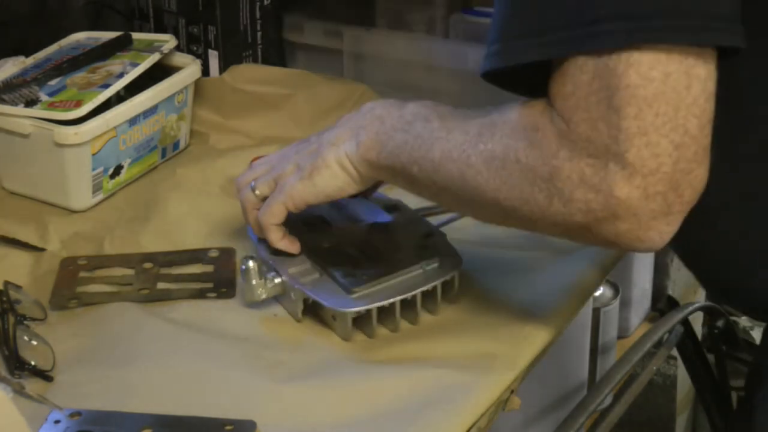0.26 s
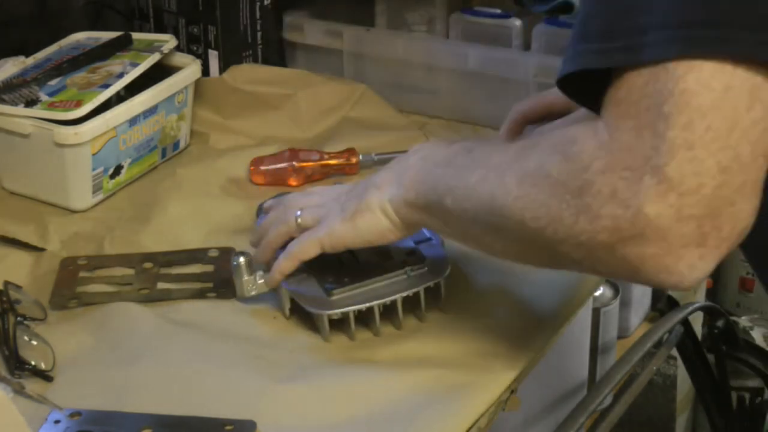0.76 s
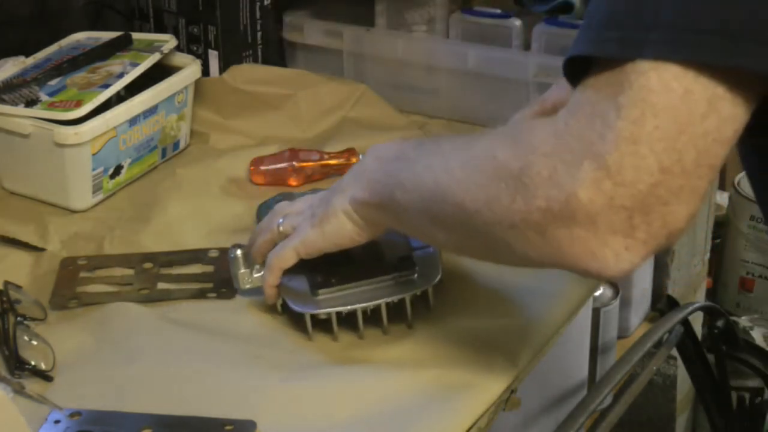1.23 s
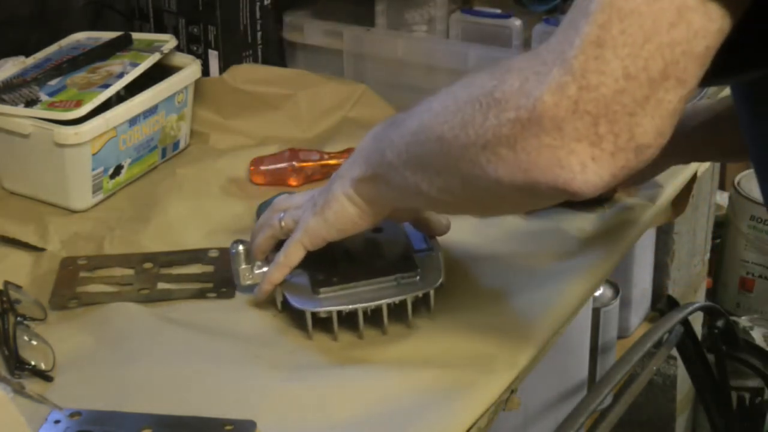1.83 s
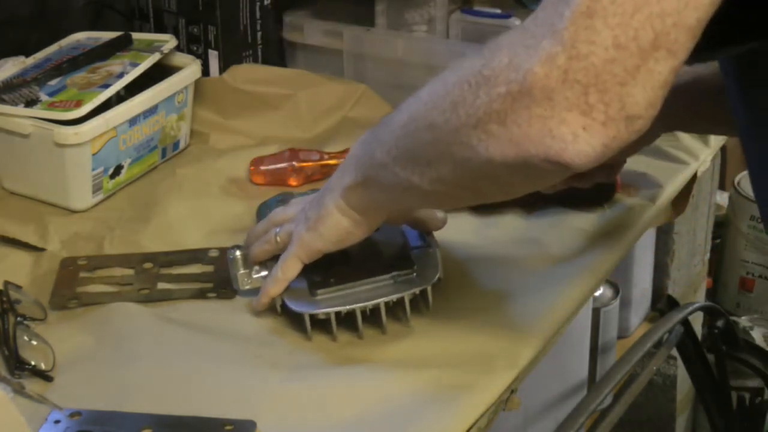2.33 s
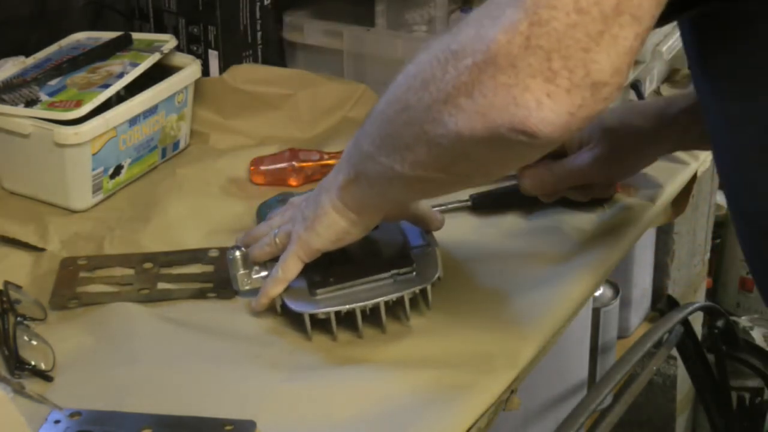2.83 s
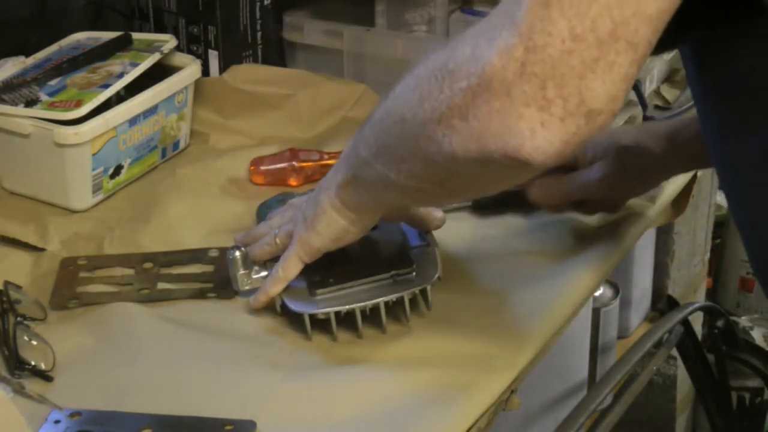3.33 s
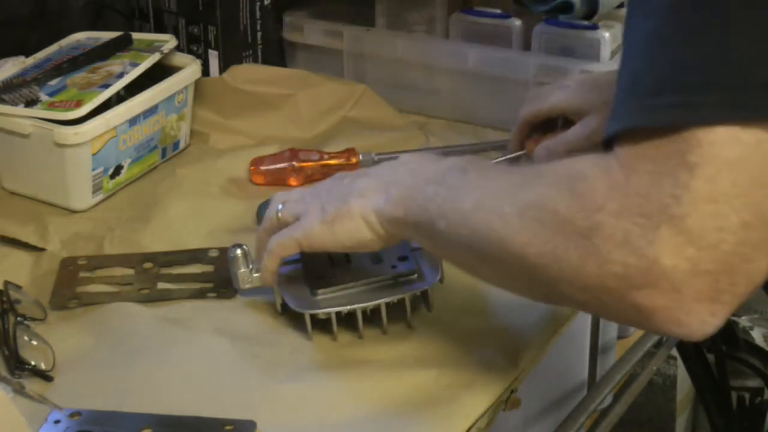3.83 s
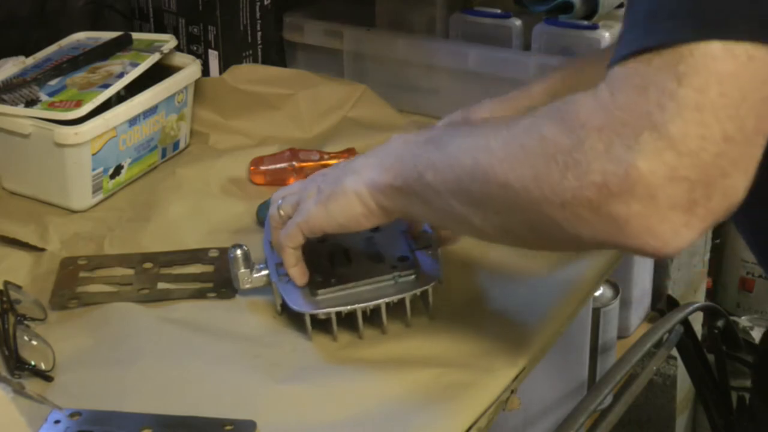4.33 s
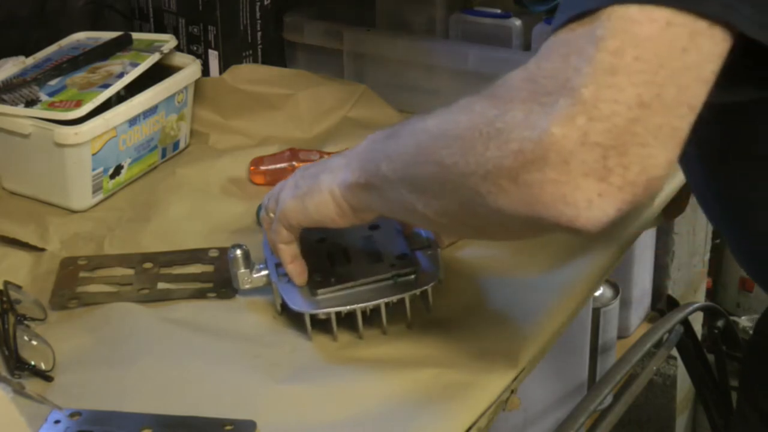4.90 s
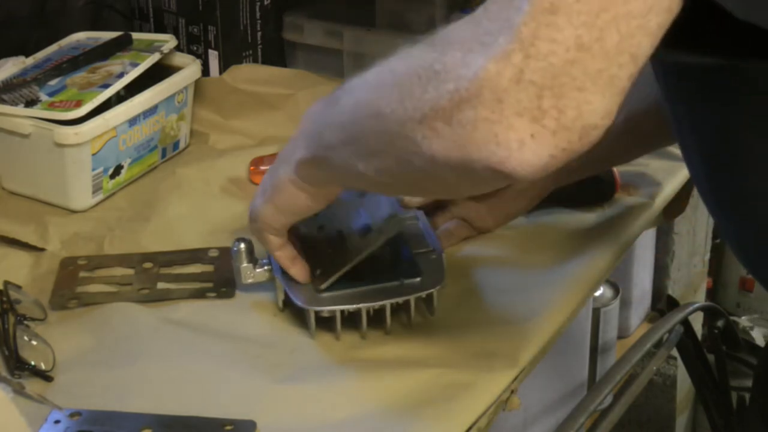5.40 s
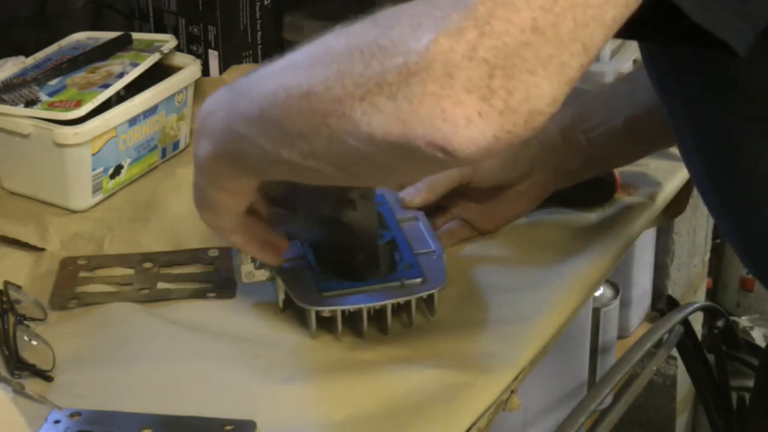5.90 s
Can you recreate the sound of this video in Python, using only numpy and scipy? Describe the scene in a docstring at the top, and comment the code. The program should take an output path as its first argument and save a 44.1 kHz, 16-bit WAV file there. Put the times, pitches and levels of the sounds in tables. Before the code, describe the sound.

A faint hum and thin, high electrical whine fill a small workshop, heard close in stereo with a short room echo. For the first 1.3 seconds a finned metal cylinder head slides over a paper-covered bench, with dry hissing, gritty ticks and soft low bumps. A screwdriver blade pings lightly at about 1 second and more faintly at 1.7, followed by a few quiet ticks. At 2.8 seconds the prised joint breaks free with a sharp, loud metallic snap, then knocks again at about 3.2. After a short slide, the screwdriver lands on the bench at about 4 seconds with a clatter and thud. More paper rubbing and small clicks follow from 4.1 to 5.4 seconds. From about 5.7 seconds the loosened metal plate clinks and rings lightly with soft knocks as it is lifted, ending in a bright clink just after 6 seconds.

```python
"""A faint hum and a thin electrical whine hang in a small workshop, heard in stereo close to the bench.
A finned compressor head is shifted about on the paper-covered top: paper hisses, grit ticks, the bench
booms. A screwdriver blade pings on the metal and prises until the joint snaps free. The tool is dropped
on the bench, and the loosened plate clinks as it is lifted. Each blow sets a metal body ringing in its
own modes, and the near walls return a short tail to the microphones."""
import sys
import numpy as np
from scipy import signal
from scipy.fft import rfft, irfft
from scipy.io import wavfile

SR = 44100
rng = np.random.default_rng(int(sys.argv[2]) if len(sys.argv) > 2 else 0)


def output_pcm(signal):
    """Save a mono or channel-first signal as 16-bit PCM at the path in sys.argv[1].

    Samples are clipped to [-1, 1] before scaling.
    """
    pcm = np.clip(np.atleast_2d(signal).T, -1, 1) * 32767
    wavfile.write(sys.argv[1], SR, np.round(pcm).astype(np.int16))


N = 271215
TIME = np.arange(N) / SR
RING_TIME = TIME[:SR // 2]
CUTOFF_HZ = 16100

# Levels are relative within each table. Room tone, spectrum of the still air: f/Hz, level/dB
AIR_SPECTRUM = [(25, -38), (60, -11), (100, -10.5), (140, -9.5), (220, -3), (300, -9), (380, -3.5),
                (440, -7), (550, -13.5), (800, -12), (1050, -20.5), (2200, -14.5), (4500, -18.5),
                (9000, -24.5), (16000, -27)]
# steady hum and whine: f/Hz, level/dB
HUM_TONES = [(100, -78.5), (301, -75.5), (866, -74), (15627.3, -67.5)]
# stereo width of the air and of the wall reflections: f/Hz, side minus mid/dB
AIR_WIDTH = [(30, 17), (65, 10), (110, 8.5), (380, 8.5), (700, 3), (2400, -5), (5000, -8.5), (15000, 1.5)]
TAIL_WIDTH = [(30, 17.5), (65, 11.5), (125, -11), (380, -1), (700, 0), (1300, 0), (2400, -1.5),
              (4400, -10.5), (8000, -8.5), (14000, 2.5)]

# a hand pushes the head or the tool over the paper: t/s, rise/s, length/s, hiss/dB, rumble/dB
SLIDES = [(0.032, 0.006, 0.049, -50.5, -63.5), (0.094, 0.071, 0.29, -46.5, -62.5),
          (0.535, 0.025, 0.069, -52.5, -59), (0.629, 0.015, 0.21, -58, -66),
          (0.899, 0.015, 0.12, -57.5, -64), (1.044, 0.067, 0.11, -45, -49), (1.195, 0.018, 0.11, -60, -67),
          (2.259, 0.048, 0.019, -57, -62), (3.31, 0.024, 0.035, -60.5, -60.5), (3.6, .03, .06, -65, -68),
          (3.777, 0.057, 0.185, -54.5, -60), (4.056, 0.028, .45, -59, -67.5),
          (4.557, 0.011, 0.17, -55, -60), (5.193, 0.056, 0.077, -50.5, -64), (5.41, 0.013, 0.018, -59, -80)]
# spectra of the rubbed paper, the bench under it and the grit: f/Hz, level/dB
HISS_SPECTRUM = [(300, -11), (1200, -16), (1900, 2.5), (3200, 0), (4500, 1.5), (6500, -2.5), (8500, -6),
                 (12000, -10), (16000, -16.5)]
RUMBLE_SPECTRUM = [(60, -11), (170, 11), (300, 6), (550, 6), (800, 6), (1300, -5), (3000, -47),
                   (16000, -108)]
GRIT_SPECTRUM = [(100, -39), (600, 2.5), (1100, -1.5), (2000, 6.5), (4500, 5.5), (6500, 4), (9000, 1.5),
                 (16000, -23)]
# grit and small edges catch; the last row is a bright clink of the plate:
# t/s, level/dB, centre f/Hz, crackle/dB
SHARP_TICKS = [(0.049, -25.5, 4300, -38.5), (0.248, -29.5, 1770, -47), (0.347, -31, 2840, -46),
               (0.461, -27, 4370, -52), (0.57, -31, 1980, -77), (0.622, -35.5, 3080, -43.5),
               (1.22, -32, 2970, -79), (1.277, -41, 7900, -43), (1.314, -35, 4750, -57),
               (1.585, -41, 4550, -65), (1.618, -35.5, 2250, -83), (1.846, -41.5, 2880, -80),
               (1.895, -41, 4000, -57), (2.232, -40, 3080, -84), (2.317, -40, 2570, -63),
               (3.295, -38.5, 2265, -57), (4.282, -40.5, 3000, -50), (4.335, -33.5, 5100, -64),
               (4.434, -35, 2500, -51), (4.562, -27.5, 5330, -41), (4.589, -28, 6220, -57),
               (4.639, -30, 3830, -45), (4.693, -32.5, 4740, -43), (4.723, -33.5, 2950, -57),
               (4.979, -32, 3400, -44), (5.098, -41, 2600, -65), (5.159, -37.5, 3700, -75),
               (5.2645, -26.5, 2510, -49), (5.652, -35.5, 1850, -61), (6.1454, -26, 4250, -28.5)]
# the head rocks, or metal knocks through to the bench: t/s, level/dB, treble edge f/Hz
BENCH_KNOCKS = [(0.134, -49, 230), (0.216, -36, 208), (0.385, -44.5, 250), (0.534, -51, 302),
                (0.644, -48, 220), (0.69, -44, 212), (0.831, -40.5, 210), (0.937, -43, 266),
                (1.03, -44, 238), (1.175, -45, 216), (2.807, -42.5, 600), (3.155, -39.5, 400),
                (3.223, -46, 490), (3.766, -49, 250), (3.834, -51, 250), (3.968, -35.5, 704),
                (4.547, -53.5, 350), (5.771, -48, 384), (5.897, -36.5, 460), (6.073, -40.5, 400)]

# blows on metal: t/s, level/dB, treble edge f/Hz, build-up/s, chatter t60/s, ring/dB
BLADE_BLOWS = [(1.022, -43.5, 4630, 0.00095, 0.16, -0.5), (1.054, -44.5, 3500, 0.019, .02, 8),
               (1.708, -54.5, 8900, 0.0024, 0.023, 8)]
JOINT_BLOWS = [(2.8063, -18, 11000, 0.00084, 0.013, -2), (2.812, -38, 7000, 0.011, 0.05, -13),
               (3.1542, -29.5, 3970, 0.0017, 0.057, 3.5), (3.218, -43, 3660, 0.013, 0.14, -4)]
DRIVER_BLOWS = [(3.938, -36.5, 11500, 0.016, 0.43, -14), (3.954, -33, 10920, 0.01, 0.081, -26),
                (3.9645, -22, 14900, 0.0023, 0.07, -5.5), (3.970, -25, 13700, 0.00037, 0.014, -2.5),
                (3.978, -31, 8160, 0.00089, 0.011, 0), (3.997, -54, 5960, .001, 0.018, -12)]
PLATE_BLOWS = [(5.760, -51, 14500, 0.0043, 0.42, -2), (5.890, -38.5, 2140, 0.0065, 0.087, -1),
               (6.065, -40.5, 4700, 0.003, 0.033, 3)]
# the modes each body rings with: f/Hz, level/dB, t60/s
BENCH_MODES = [(105.6, -17.5, 0.14), (170.7, -3, 0.13), (216.4, 6, 0.077), (290.5, 1, 0.13),
               (371, -19, 0.21), (433.3, -4.5, 0.18), (613, -2, 0.073)]
BLADE_MODES = [(1450, -6, 0.074), (1840, -17.5, 0.55), (2277, -16, 0.074), (2920, 7.5, 0.057),
               (2950, 1.5, 0.13), (3100, 1, 0.08), (3330, -19, 0.14), (4860, -4, 0.069), (4500, -4, 0.058),
               (6020, -8, 0.069)]
HEAD_MODES = [(690, -12, .08), (727, -8, .1), (765, -13, .08), (1030, -18, .1), (2640, -20, .14),
              (2704, -18, .16), (2772, -18, .16), (3400, -19, .16), (4140, -20, .14), (4700, -16, .15),
              (5070, -20, .15), (5696, -9, .11), (9970, -22, .11)]
DRIVER_MODES = [(710, -11, .09), (1875, -12, .12), (2505, -13, .12), (4272, -17, .1), (4605, -15, .11),
                (4710, -15, .11), (4916, -16, .11), (5965, -16, .1)]
PLATE_MODES = [(1020, -1.5, 0.065), (1453, -5.5, 0.072), (1910, -10, 0.27), (1950, -15, 0.44),
               (1966, 8.5, 0.065), (2260, -15, 0.69), (2360, 4.5, 0.027), (2840, -15, 0.15),
               (2990, -3, 0.089), (4160, -6.5, 0.086), (4300, -21, 0.22), (5700, -17, 0.24),
               (5940, -9, 0.75), (6300, -11, 0.06), (6750, -12, 0.2), (6770, -1, 0.15), (7600, -12, .1),
               (8200, -7.5, 0.25), (9800, -19, 0.16), (10800, -15, 0.3)]
# spectra of the dense, quickly damped modes in between: f/Hz, level/dB
BENCH_SPECTRUM = [(30, -35), (70, -12), (200, 8), (400, 4.5), (800, -20), (2000, -63), (16000, -85)]
HEAD_SPECTRUM = [(40, -40), (110, -22), (300, -2), (520, -2.5), (730, 4), (900, -3), (1200, -12),
                 (1550, -8.5), (1900, -7), (2900, -4), (4800, -2.5), (7500, -7), (10500, -12), (16000, -11)]
DRIVER_SPECTRUM = [(40, -31), (130, -6.5), (300, 3.5), (700, 3), (1200, -3), (2400, 1), (4600, 5.5),
                   (7500, 1), (16000, -10.5)]
PLATE_SPECTRUM = [(100, -14), (700, -2.5), (1200, -11.5), (2000, -4.5), (3500, -12.5), (6000, -6),
                  (16000, -25)]


def from_db(db):
    """Decibels to gain."""
    return 10 ** (np.asarray(db) / 20)


def unit_rms(x):
    """Scale to an rms of 1."""
    return x / np.sqrt(np.mean(x ** 2) + 1e-20)


def bin_gains(spectrum, size):
    """A spectrum read off at the bins of an FFT."""
    hz, db = np.transpose(spectrum)
    bin_hz = np.arange(size // 2 + 1) * SR / size
    return from_db(np.interp(np.log(bin_hz + 1), np.log(hz), db))


def colour(x, spectrum):
    """Minimum-phase filter with this spectrum; white noise keeps its power."""
    size = 2 ** 12
    cepstrum = irfft(np.log(unit_rms(bin_gains(spectrum, size))))
    cepstrum[1:size // 2] *= 2
    cepstrum[size // 2 + 1:] = 0
    impulse = irfft(np.exp(rfft(cepstrum)))
    return signal.fftconvolve(x, impulse)[:len(x)]


def soften(x, edge_hz):
    """A softer contact passes less treble."""
    return signal.sosfilt(signal.butter(2, min(edge_hz, .45 * SR), fs=SR, output="sos"), x)


def drift(per_s):
    """A line wandering through per_s random values a second."""
    knots = rng.standard_normal(N // 10)
    return np.interp(TIME * per_s, np.arange(len(knots)), knots)


def diffuse(size, width):
    """Noise reaching the two microphones from all sides."""
    mid, side = rng.standard_normal((2, size))
    side = irfft(rfft(side) * bin_gains(width, size), size)
    return np.array([mid + side, mid - side])


def add(track, start_s, sound):
    """Mix a sound in at start_s."""
    at = int(start_s * SR)
    track[at:at + len(sound)] += sound[:max(N - at, 0)]


def decay(t60):
    """Envelope that falls 60 dB in t60 seconds."""
    return from_db(-60 * RING_TIME / t60)


def swell(seconds):
    """Envelope that builds up over this time, then holds."""
    return np.minimum((RING_TIME + 1 / SR) / seconds, 1)


def burst(t60, crack_db, crack_t60):
    """The crack of contact over a crowd of damped modes, as two decays of noise."""
    return rng.choice([-1, 1], len(RING_TIME)) * (decay(t60) + from_db(crack_db) * decay(crack_t60))


def ring(modes, vary_db):
    """Each blow meets a new spot and so weights the modes anew."""
    hz, db, t60 = np.transpose(modes)[:, :, None]
    weights = from_db(db + vary_db * rng.standard_normal(hz.shape)) * rng.choice([-1, 1], hz.shape)
    return np.sum(weights * np.sin(2 * np.pi * hz * RING_TIME) * decay(t60), axis=0)


def room_tone(air_db, waver_db):
    """Air all around, with a slightly wavering hum and electrical whine in the centre."""
    air = np.array([colour(channel, AIR_SPECTRUM) for channel in diffuse(N, AIR_WIDTH)])
    hum = np.zeros(N)
    for hz, db in HUM_TONES:
        amplitude = np.sqrt(2) * from_db(db + waver_db * drift(per_s=3.04))
        hum += amplitude * np.sin(2 * np.pi * hz * TIME)
    return from_db(air_db) * air + hum


def paper_slides(hiss_db, rumble_db, grain_db, judder_db, stop_t60):
    """Paper fibres slip in dense uneven grains, which also shake the bench top."""
    hiss, rumble = np.zeros((2, N))
    for start_s, rise_s, length_s, high_db, low_db in SLIDES:
        speeding_up = np.clip((TIME - start_s) / rise_s, 0, 1)
        stopping = from_db(-60 * np.clip((TIME - start_s - length_s) / stop_t60, 0, 2))
        speed = speeding_up * stopping
        hiss = np.maximum(hiss, from_db(high_db + hiss_db) * speed)
        rumble = np.maximum(rumble, from_db(low_db + rumble_db) * speed)
    grains = rng.standard_normal(N) * from_db(grain_db * np.minimum(rng.exponential(1, N), 5))
    slips = unit_rms(grains * from_db(judder_db * drift(per_s=120)))
    return colour(slips * hiss, HISS_SPECTRUM) + colour(slips * rumble, RUMBLE_SPECTRUM)


def fine_grit(per_s=20, over_hiss_db=13.5, centre_hz=2850, spread_octaves=0.29):
    """Fine grit turns over at random in each slide: rows like SHARP_TICKS, without crackle."""
    rows = []
    for start_s, rise_s, length_s, hiss_db, _ in SLIDES:
        draws = rng.random(size=(12, 3))
        for chance, place, pitch in draws:
            if chance < per_s * length_s / len(draws):
                at_s = start_s + rise_s + place * (length_s - rise_s)
                hz = centre_hz * 2 ** (spread_octaves * (2 * pitch - 1))
                rows.append((at_s, hiss_db + over_hiss_db, hz, -np.inf))
    return rows


def dry_ticks(body_db, crackle_db, build_s, firm_db, split_hz):
    """Catching grit and edges, and one last bright plate clink: bursts of noise, each at its own pitch."""
    body, crackle = np.zeros((2, N))
    for start_s, db, hz, top_db in list(SHARP_TICKS) + fine_grit():
        # firm contacts click; light ones are slower, softer rubs
        onset = swell(build_s * from_db(firm_db - db))
        tick = burst(t60=0.063, crack_db=-10, crack_t60=0.0017) * onset
        band = signal.butter(1, [hz / 2, min(hz * 2, CUTOFF_HZ)], "band", fs=SR, output="sos")
        add(body, start_s, from_db(db + body_db) * signal.sosfilt(band, tick))
        add(crackle, start_s, from_db(top_db + crackle_db) * tick)
    treble = signal.butter(3, split_hz, "high", fs=SR, output="sos")
    return soften(colour(body, GRIT_SPECTRUM), split_hz) + signal.sosfilt(treble, crackle)


def bench_booms(t60, dense_db, modes_db, swell_s):
    """Cushioned by the paper, the bench top swells into a low, round boom at each knock."""
    booms = np.zeros(N)
    for start_s, db, edge_hz in BENCH_KNOCKS:
        thud = rng.standard_normal(len(RING_TIME)) * decay(t60)
        dense = from_db(dense_db) * colour(thud, BENCH_SPECTRUM)
        tones = from_db(modes_db) * ring(BENCH_MODES, vary_db=2.75)
        boom = (dense + tones) * swell(swell_s)
        add(booms, start_s, from_db(db) * soften(boom, edge_hz))
    return booms


def struck_metal(blows, spectrum, modes, t60, crack_db, dense_db, modes_db, vary_db, hard_db):
    """Blows on one metal body; returns the clatter of its dense modes and the ring of its clear ones."""
    clatter, ringing = np.zeros((2, N))
    hard_share = from_db(hard_db)
    for start_s, db, edge_hz, build_s, chatter_s, ring_db in blows:
        dense = from_db(dense_db) * colour(burst(t60, crack_db, chatter_s), spectrum)
        tones = from_db(modes_db + ring_db) * ring(modes, vary_db)
        blow = from_db(db) * swell(build_s) * np.array([dense, tones])
        # hard high spots let a little treble past the soft contact
        blow = (1 - hard_share) * soften(blow, edge_hz) + hard_share * blow
        add(clatter, start_s, blow[0])
        add(ringing, start_s, blow[1])
    return np.array([clatter, ringing])


def blade_pings():
    """The screwdriver blade touches metal lightly and rings."""
    return struck_metal(BLADE_BLOWS, GRIT_SPECTRUM, BLADE_MODES, t60=0.086, crack_db=3,
                        dense_db=-2.5, modes_db=1, vary_db=0.5, hard_db=-40)


def joint_snap():
    """The prised joint snaps free and the finned head knocks back."""
    return struck_metal(JOINT_BLOWS, HEAD_SPECTRUM, HEAD_MODES, t60=0.034, crack_db=6,
                        dense_db=-2.5, modes_db=1, vary_db=1.5, hard_db=-15.5)


def screwdriver_drop():
    """The screwdriver slides in, lands on the bench and rattles."""
    return struck_metal(DRIVER_BLOWS, DRIVER_SPECTRUM, DRIVER_MODES, t60=0.044, crack_db=0.5,
                        dense_db=-3.5, modes_db=4.5, vary_db=-1.5, hard_db=-34)


def plate_clinks():
    """The loose plate meets the head as it is lifted, and rings on."""
    return struck_metal(PLATE_BLOWS, PLATE_SPECTRUM, PLATE_MODES, t60=0.092, crack_db=-5.5,
                        dense_db=1, modes_db=-0.5, vary_db=0.5, hard_db=-11.5)


def workshop(direct, wet_db, low_t60, mid_t60, high_t60):
    """Close, cluttered walls add a short diffuse stereo tail to the direct sound."""
    noise = rfft(diffuse(len(RING_TIME), TAIL_WIDTH))
    hz = np.linspace(0, SR / 2, len(RING_TIME) // 2 + 1)
    bands = [(0, 600, low_t60), (600, 7000, mid_t60), (7000, SR, high_t60)]
    tail = sum(irfft(noise * ((hz >= low) & (hz < high))) * decay(t60) for low, high, t60 in bands)
    tail *= swell(0.006)
    tail *= from_db(wet_db) / np.sqrt(np.sum(tail ** 2) / 2)
    return direct + signal.fftconvolve(direct[None], tail, axes=1)[:, :N]


def scene():
    """Metal, bench and paper close to the microphones, with the workshop around them."""
    clatter, ringing = joint_snap() + screwdriver_drop() + blade_pings() + plate_clinks()
    bench = bench_booms(t60=0.063, dense_db=2.5, modes_db=-0.5, swell_s=0.0088)
    paper = paper_slides(hiss_db=-1, rumble_db=-1.5, grain_db=3, judder_db=3, stop_t60=0.3)
    ticks = dry_ticks(body_db=-8.5, crackle_db=-2, build_s=0.0017, firm_db=-34, split_hz=7000)
    noises = workshop(clatter + paper + ticks, wet_db=-3.5, low_t60=0.37, mid_t60=0.23, high_t60=0.2)
    tones = workshop(ringing, wet_db=-13, low_t60=0.15, mid_t60=0.2, high_t60=0.17)
    tones *= from_db([[0.8], [-0.8]])  # the ringing is a little stronger on the left
    booms = workshop(bench, wet_db=-6, low_t60=0.26, mid_t60=0.19, high_t60=0.051)
    return noises + tones + booms + room_tone(air_db=-64, waver_db=0.7)


def record(dry):
    """Both microphone channels are cut steeply above CUTOFF_HZ."""
    return signal.sosfilt(signal.ellip(12, .1, 70, CUTOFF_HZ, fs=SR, output="sos"), dry)


dry = scene()
out = record(dry)
output_pcm(out)
```